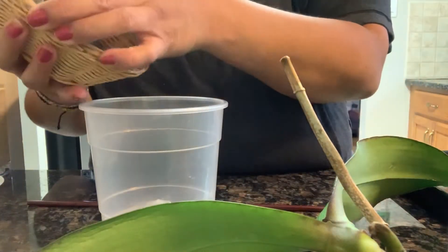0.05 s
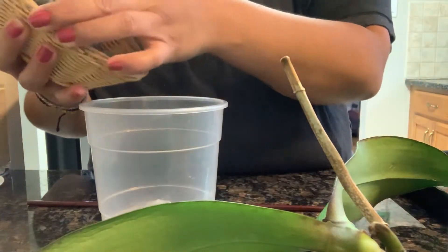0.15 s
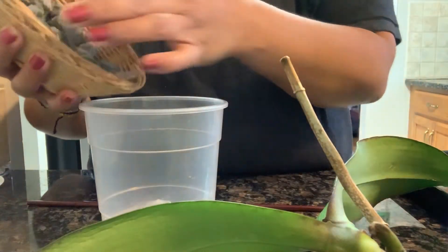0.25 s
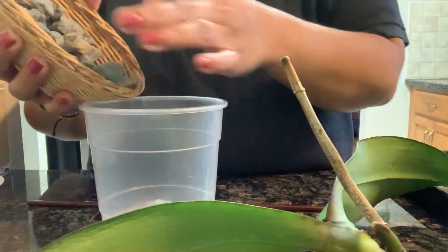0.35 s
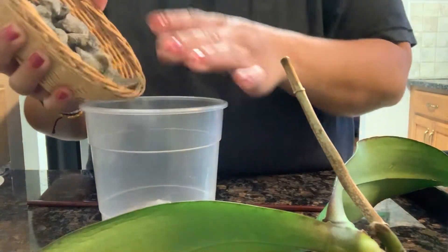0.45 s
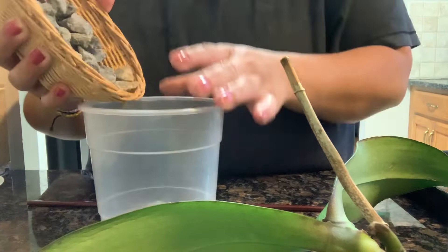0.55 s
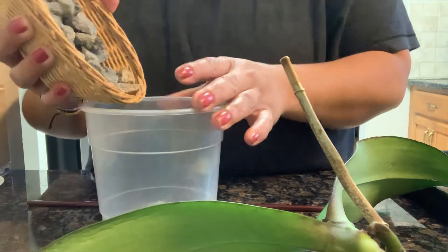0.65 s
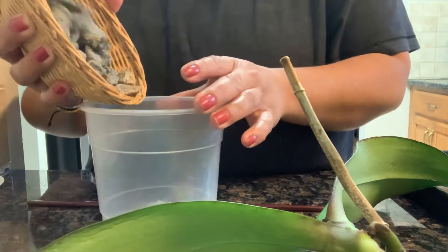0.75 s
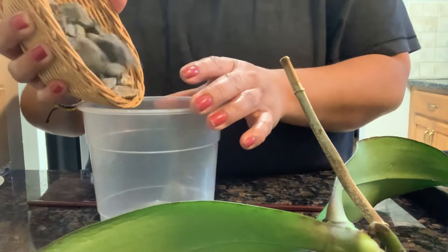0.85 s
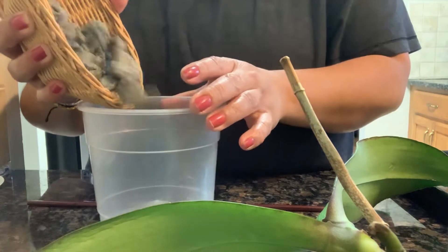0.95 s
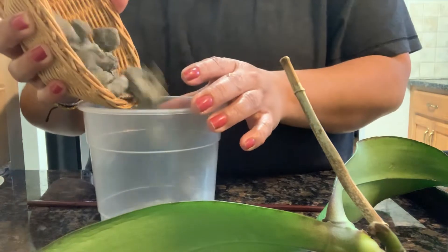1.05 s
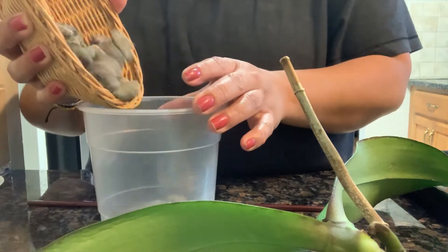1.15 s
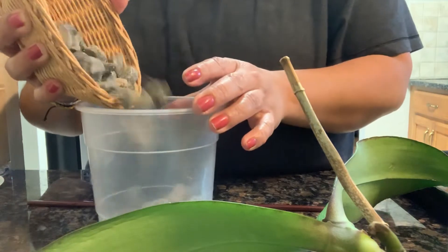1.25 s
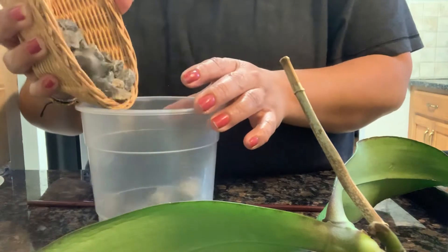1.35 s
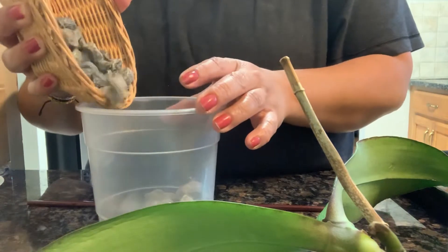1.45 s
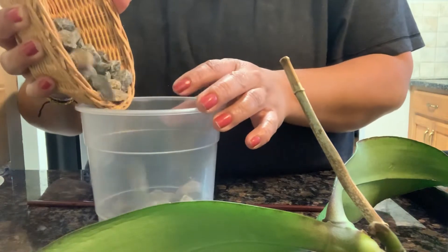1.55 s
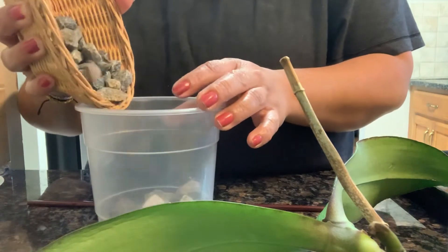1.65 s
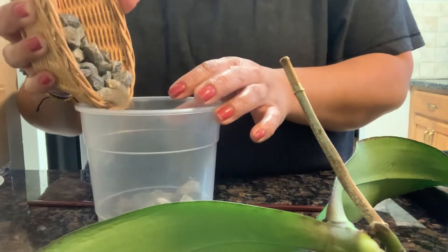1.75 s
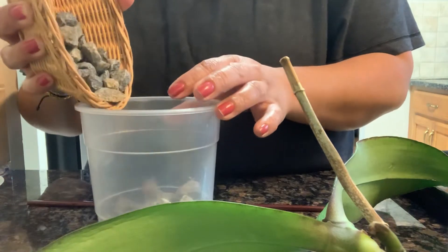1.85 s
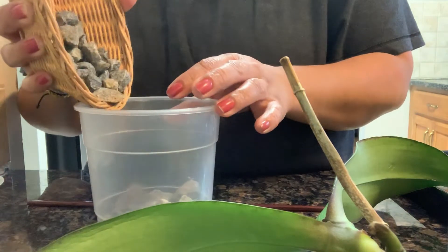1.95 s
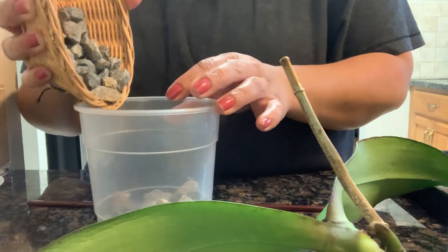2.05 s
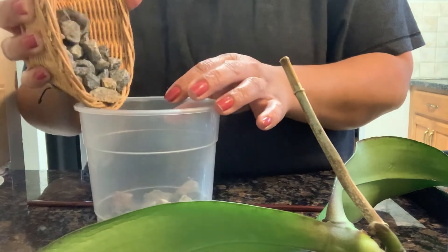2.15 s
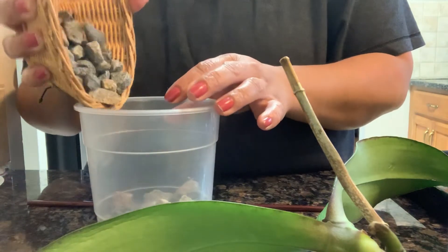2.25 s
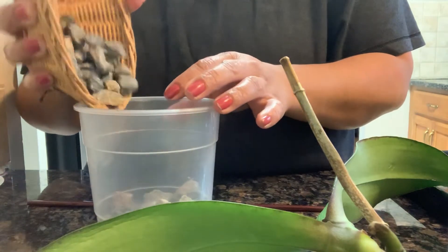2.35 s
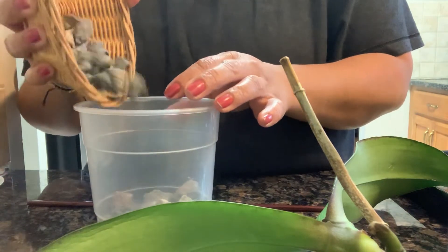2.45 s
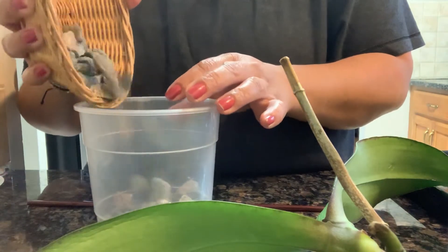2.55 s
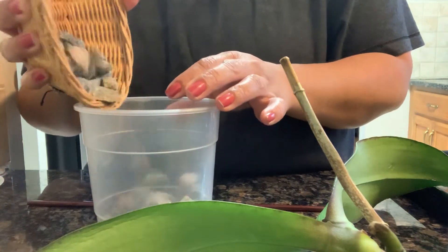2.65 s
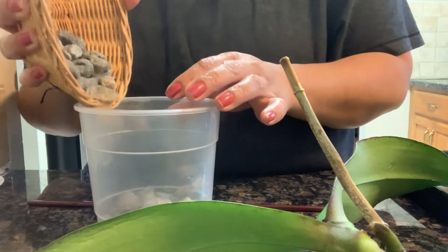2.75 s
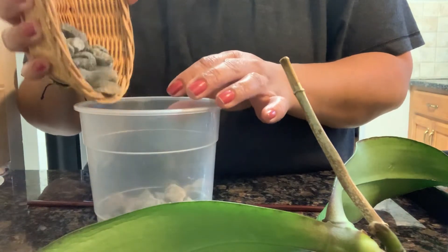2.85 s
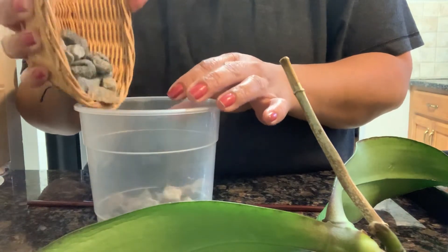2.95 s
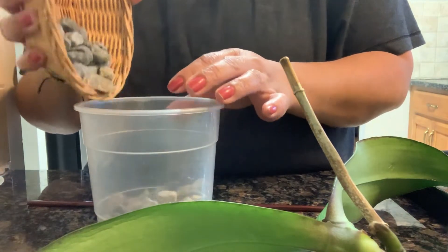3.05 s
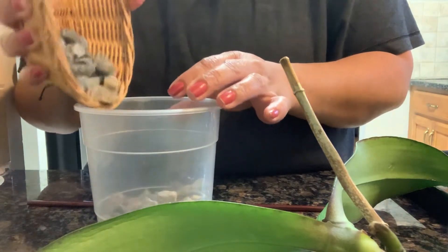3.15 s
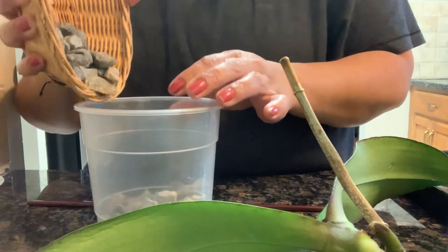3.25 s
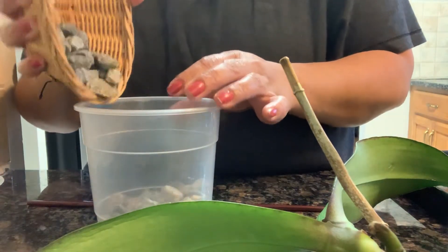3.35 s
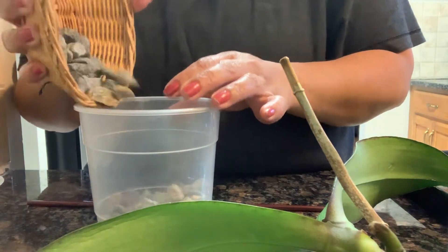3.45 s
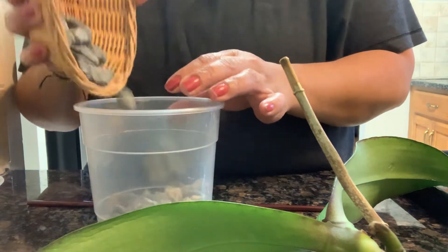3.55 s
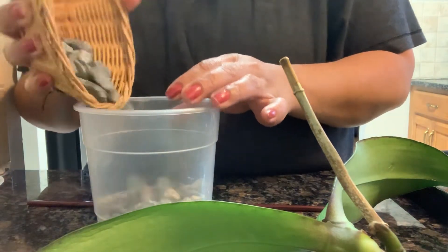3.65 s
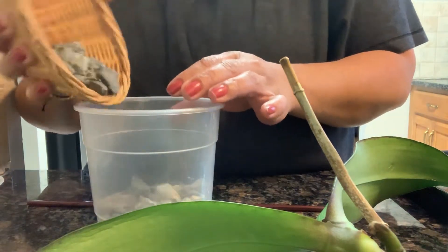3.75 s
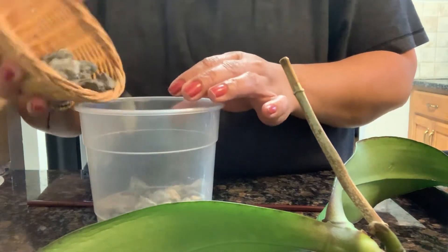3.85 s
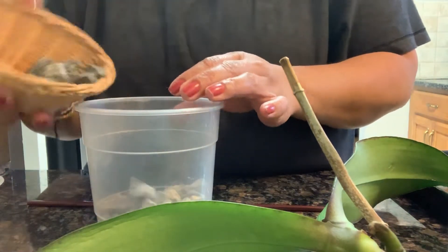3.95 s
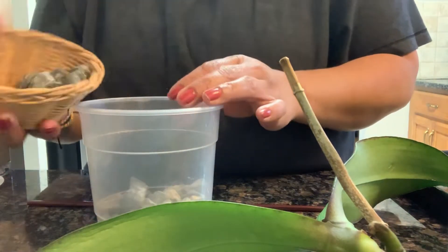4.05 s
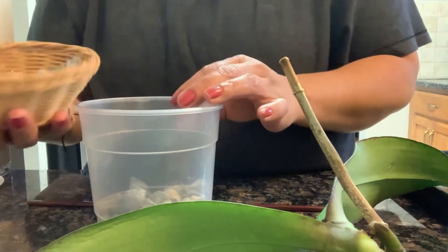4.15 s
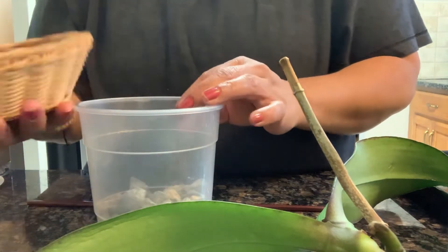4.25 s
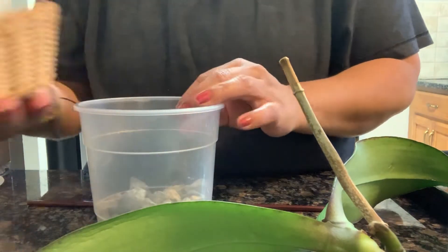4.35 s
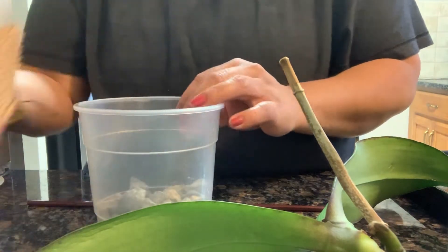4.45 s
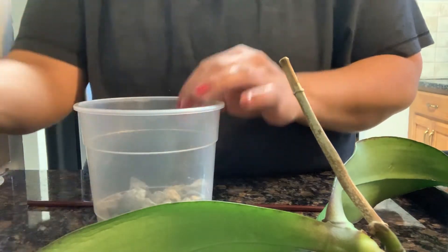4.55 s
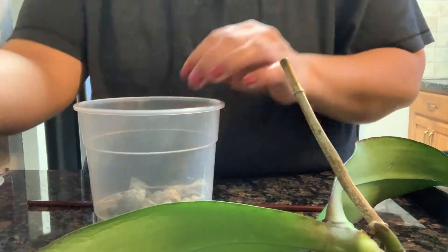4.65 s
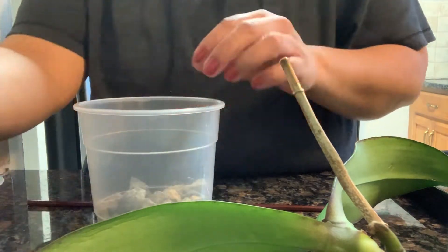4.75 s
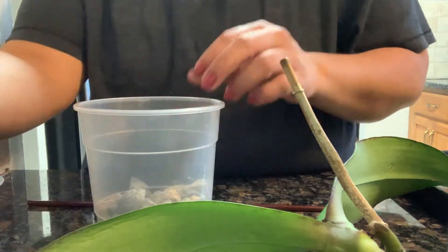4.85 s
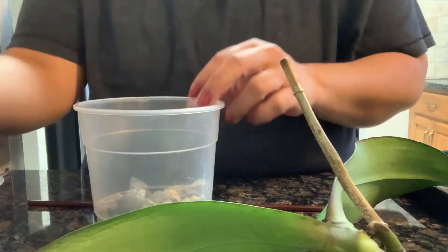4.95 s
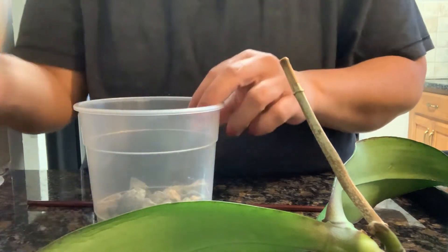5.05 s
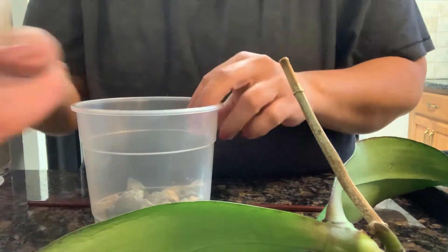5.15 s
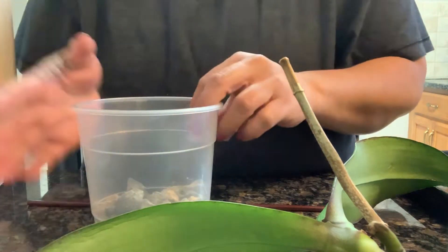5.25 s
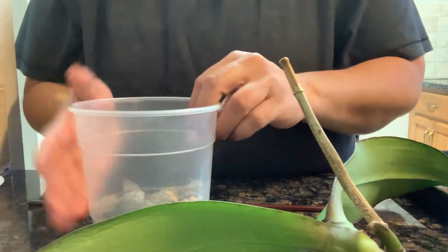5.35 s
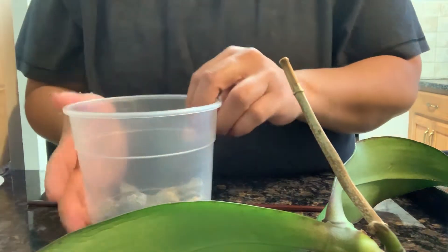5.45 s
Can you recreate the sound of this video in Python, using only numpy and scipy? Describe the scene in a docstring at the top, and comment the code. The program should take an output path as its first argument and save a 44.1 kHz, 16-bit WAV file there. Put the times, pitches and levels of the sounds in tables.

```python
"""Rough stones slide out of a wicker basket into a thin plastic pot on a stone counter, close to a phone.
Each blow is a noise flurry with a clean push that drives resonant modes: the pot rings near the struck spot,
the counter thumps, and stones crack on each other. Random grains over a smooth scrape make grit and wicker
rustle between the blows; decaying bands of noise answer as a small kitchen over an appliance rumble."""
import sys
import numpy as np
from scipy import signal
from scipy.fft import rfft, irfft
from scipy.io import wavfile
from scipy.ndimage import uniform_filter1d

SR = 44100
rng = np.random.default_rng(int(sys.argv[2]) if len(sys.argv) > 2 else 0)


def to_wav(s):
    """Save 16-bit WAV."""
    ch = np.atleast_2d(s).T  # columns
    pcm = np.round(np.clip(ch, -1, 1) * 32767)  # PCM
    wavfile.write(sys.argv[1], SR, pcm.astype(np.int16))


N = 242942  # length in samples

# stones landing on the pot: (t/s, level/dB, pitch of the struck spot f/Hz)
KNOCKS = [(.345, -25, 740), (0.364, -26, 670), (.457, -35.5, 460), (0.496, -23.5, 453), (.570, -8, 666),
          (.592, -12, 386), (.670, -21.5, 323), (.714, -36.5, 320), (.766, -19.5, 650), (.775, -13.5, 664),
          (0.857, -16.5, 910), (0.906, -23.5, 670), (.927, -22.5, 700), (0.971, -30, 550), (.993, -14, 635),
          (1.019, -22.5, 460), (1.055, -3.5, 940), (1.072, -14, 690), (1.088, -11, 694),
          (1.110, -20.5, 640), (1.131, -5.5, 900), (1.147, -10, 860), (1.172, -9.5, 880), (1.184, -6, 990),
          (1.196, -8, 756), (1.212, -9, 740), (1.224, -19, 680), (1.244, -4, 636), (1.273, -13.5, 563),
          (1.316, -13.5, 930), (1.335, -8.5, 600), (1.355, -9.5, 580), (1.372, -6.5, 590),
          (1.392, -6.5, 665), (1.431, -13.5, 790), (1.454, -12.5, 650), (1.493, -21.5, 543),
          (1.508, -12, 810), (1.526, -14.5, 910), (1.553, -27, 765), (1.575, -11.5, 860),
          (1.604, -9.5, 735), (1.656, -14, 885), (1.671, -22, 880), (1.716, -11.5, 960),
          (1.751, -24.5, 1030), (1.806, -21.5, 780), (1.845, -26.5, 780), (1.881, -17, 830),
          (1.969, -19.5, 980), (2.004, -28.5, 505), (2.028, -19.5, 510), (2.042, -18.5, 575),
          (2.078, -25, 540), (2.102, -35, 477), (2.248, -34, 332), (2.385, -28, 493), (2.415, -31.5, 394),
          (2.531, -13.5, 790), (2.548, -14.5, 500), (2.590, -6.5, 460), (2.601, -6, 620),
          (2.624, -12.5, 715), (2.656, -16, 614), (2.672, -14, 605), (2.707, -14, 420), (2.739, -11.5, 920),
          (2.781, -26, 520), (2.826, -15, 620), (2.84, -10, 483), (2.873, -9, 770), (2.906, -16.5, 496),
          (2.977, -20.5, 500), (2.803, -26.5, 500), (3.022, -15.5, 980), (3.046, -20.5, 460),
          (3.106, -23, 1200), (3.128, -27.5, 570), (3.171, -28, 515), (3.206, -23.5, 560),
          (3.352, -16.5, 880), (3.396, -26, 1110), (3.475, -19, 500), (3.506, -28.5, 755),
          (3.607, -15.5, 880), (3.626, -11, 567), (3.657, -8.5, 870), (3.708, -13, 496),
          (3.774, -24.5, 1010), (3.799, -31.5, 950), (3.814, -30.5, 494), (3.841, -34, 560),
          (3.951, -20.5, 613), (3.991, -25.5, 560), (4.067, -29.5, 895), (4.092, -29, 600),
          (4.128, -33, 1020), (4.189, -32.5, 930), (3.898, -41, 580), (4.273, -41.5, 604),
          (4.305, -40, 413), (4.518, -42.5, 820), (4.573, -40, 800), (4.660, -31, 720), (4.694, -43.5, 784),
          (4.750, -31, 397), (4.771, -33, 620), (4.849, -36, 840), (5.028, -44, 470), (4.888, -43, 590),
          (5.099, -45.5, 700), (5.179, -45, 364), (5.309, -47, 621.4), (5.376, -50, 790),
          (5.454, -44.5, 865)]


def undb(db):
    """Turn decibels into amplitude gain."""
    return 10 ** (np.asarray(db) / 20)


def fade(t60):
    """Give the amplitude gain per sample of a 60 dB decay over t60 seconds."""
    return np.exp(-np.log(1000) / (t60 * SR))


def ears(alike, size=N):
    """Make stereo noise whose two sides correlate by alike (0-1), from a mid and a side noise."""
    mid, side = rng.standard_normal((2, size))
    alike = np.clip(alike, 0, 1)
    opposed = side * np.array([[1], [-1]])
    return np.sqrt((1 + alike) / 2) * mid + np.sqrt((1 - alike) / 2) * opposed


def colour(x, points):
    """Shape a spectrum by (f/Hz, gain/dB) points, interpolated along log frequency."""
    hz, db = np.transpose(points)
    f = np.maximum(np.arange(N // 2 + 1) * SR / N, 1)
    gain = undb(np.interp(np.log(f), np.log(hz), db))
    return irfft(rfft(x) * gain, N)


def hum():
    """A low appliance rumble: coloured noise, nearly mono, whose level wavers a little."""
    # rumble spectrum before levelling: (f/Hz, relative density/dB)
    rumble_spectrum = [(15, -24.5), (25, -4), (59, -3), (125, -6), (207, -18), (293, -14), (326, -3),
                       (363, -7.5), (573, -15.5), (637, -29.5), (790, -32.5), (2780, -40), (4040, -29.5),
                       (8550, -41), (15000, -63)]
    level_db = -55  # RMS of the rumble
    step = SR // 6
    held = np.repeat(rng.standard_normal(N // step + 1), step)[:N]
    waver = uniform_filter1d(held, step)
    x = colour(ears(0.95), rumble_spectrum) * undb(2.0 * waver)
    return x * undb(level_db) / np.sqrt(np.mean(x ** 2))


def kitchen(x):
    """Dense echoes: noise bands that swell over a few milliseconds, then decay, longest in the bass."""
    # echo bands: (centre f/Hz, t60/s, level/dB, likeness of the two sides 0-1)
    echo_bands = [(150, 0.9, -14, 1), (390, 0.2, -7.5, 0.7), (926, 0.23, -9.5, 0.7),
                  (2700, 0.1, -4.5, 0.96), (6050, 0.092, -7, 0.4), (12000, 0.064, -11, 0.3)]
    n = np.arange(SR // 2)
    swell = 1 - np.exp(-n / (0.0042 * SR))
    echo = 0
    for hz, t60, db, alike in echo_bands:
        band = signal.butter(2, [hz / 1.6, hz * 1.6], "bandpass", fs=SR, output="sos")
        tail = ears(alike, len(n)) * fade(t60) ** n * swell
        level = undb(db) * np.sqrt(1 - fade(t60) ** 2)  # long tails start quieter
        echo = echo + level * signal.sosfilt(band, tail)
    return signal.fftconvolve(x, echo, axes=1)[:, :N]


def rustle():
    """Grit and wicker: tiny random knocks over a smooth scrape, with the power that slides in each layer."""
    # sliding over time: (t/s, level/dB, pot against it/dB, treble against it/dB)
    slide_curve = [(0, -73, -10, -10), (.16, -72.5, 0.5, -6), (.5, -55, 0.5, 0.5), (.74, -50.5, -16, -3),
                   (0.931, -48, -3, 10), (1.2, -29, 1, 0.5), (1.3, -40, 4, -3.5), (1.38, -36, 8, 1),
                   (1.9, -48, -4, -21), (2.18, -61, -11, -19.5), (2.3, -59.5, -9, -0.5),
                   (2.48, -53, -0.5, 1.5), (2.72, -32, 4, -9.5), (3.1, -52.5, 0, -14), (3.31, -63, -5, -16),
                   (3.55, -53, -0.5, 2), (3.699, -39.5, 8, -6.5), (3.92, -58.5, -1.5, -15),
                   (4.1, -53, 8.5, -9), (4.22, -64.5, 3, -0.5), (4.3, -55, -2.5, -3), (4.4, -65.5, -2, 5),
                   (4.52, -55.5, 0, 6), (4.82, -51, -0.5, -2), (5.0, -66.5, 2.5, -3), (5.12, -57, -8, -9.5),
                   (5.24, -73, -3, -20), (5.34, -61, -9, -3.5), (5.51, -68, -4.5, -8)]
    grit_per_s, grit_spread_db, scrape_share = 790, 3, 0.24
    counter_db = -11  # counter against the sliding level
    t, level_db, pot_db, treble_db = np.transpose(slide_curve)
    hits = rng.random(N) < grit_per_s / SR
    grit = hits * undb(grit_spread_db * rng.exponential(size=N)) ** 2
    grain = scrape_share + (1 - scrape_share) * grit / grit.mean()
    now = np.arange(N) / SR
    layers = (pot_db, 0, treble_db, counter_db)  # pot, stones, treble, counter
    return grain, [undb(np.interp(now, t, level_db + db)) ** 2 for db in layers]


def settle(s, db):
    """Loosened grit: each blow adds power that trickles away exponentially."""
    settle_db, settle_t60_s = -22.5, 0.21
    power = np.zeros(N)
    np.add.at(power, (s * SR).astype(int), undb(db + settle_db) ** 2)
    return signal.lfilter([1], [1, -fade(settle_t60_s) ** 2], power)


def strike(modes, s, db, hz, bed, reach, rise_s, t60, alike, push_db, tilt):
    """A swelling flurry of rough contacts plus one clean push rings the modes near each blow's pitch.

    reach is in octaves; bed is the rustle power that feeds the same modes, coloured by tilt.
    """
    favour_db, contact_cycles = 3.0, .3
    f, mode_db = np.array(modes)[:, 0], np.array(modes)[:, 1]
    gain = undb(mode_db) ** 2
    octaves_off = np.log2(f[:, None] / hz)
    share = gain[:, None] * (np.exp(-(octaves_off / reach) ** 2) + 0.067)
    # each stone lands its own way and favours other modes
    share = share * undb(favour_db * rng.standard_normal((len(s), len(f))).T) ** 2
    share = share / share.sum(axis=0) * undb(db) ** 2
    # most modes start the same way, a few against it
    sign = np.sign(rng.standard_normal(share.shape[::-1]).T + .9)
    push = undb(push_db) * np.sqrt(share) * sign
    bed_share = gain * (f / f.mean()) ** tilt
    bed_share = bed_share / bed_share.sum()
    rise, fall = np.exp(-1 / (rise_s * SR)), fade(t60) ** 2
    swell_poles = np.poly([rise, rise, fall])
    # the contact force jumps about once a millisecond
    jumps = undb(2.38 * np.repeat(rng.standard_normal(N // 40 + 1), 40)[:N])
    rough = ears(alike) * jumps / np.sqrt(np.mean(jumps ** 2))
    at = (s * SR).astype(int)
    out = 0
    for k, (mode_hz, _, ring_t60) in enumerate(modes):
        power = bed * (1 - fall) * bed_share[k]
        np.add.at(power, at, share[k])
        power = signal.lfilter([(1 - rise) ** 2], swell_poles, power + 1e-18)
        flurry = np.sqrt(power + 1e-18)
        clean = np.full(N, 1e-18)
        np.add.at(clean, at + int(2 * rise_s * SR), push[k])
        # a push lasts part of a cycle
        clean = uniform_filter1d(clean, size=max(int(contact_cycles * SR / mode_hz), 1))
        r, w = fade(ring_t60), 2 * np.pi * mode_hz / SR
        poles = [1, -2 * r * np.cos(w), r * r]
        out = out + signal.lfilter(np.sqrt(1 - r) * np.array([1, 0, -1]), poles, flurry * rough)
        out = out + signal.lfilter([np.sin(w)], poles, clean)
    return out


def counter_thumps(grain, sliding):
    """The stone counter's low modes answer every knock a little, the blows through the pot's floor, and the pot
    shifting on the counter late on."""
    # counter modes: (f/Hz, level/dB, t60/s)
    counter_modes = [(60, -22.5, 0.27), (91, 1.5, 0.065), (124, 12, 0.11), (168, 6, .07)]
    # blows that reach the counter through the pot's floor, and late on the pot shifting on the counter: (t/s,
    # level/dB)
    thuds = [(0.343, -33), (.495, -25), (0.593, -20.5), (0.668, -23.5), (0.773, -17), (0.926, -23.5),
             (1.02, -13.5), (1.088, -18.5), (1.195, -15.5), (1.245, -13.5), (1.355, -15), (1.398, -24.5),
             (1.492, -24.5), (1.882, -29), (2.043, -34), (2.395, -29.5), (2.548, -24.5), (2.592, -16),
             (2.730, -23.5), (2.828, -24.5), (3.495, -31), (3.657, -19), (3.991, -38), (4.750, -34),
             (4.783, -35.5), (4.818, -42), (4.888, -37), (5.048, -37), (5.181, -46)]
    thump_db, cushion_db_per_s = -22, 3.5  # knocks thump less as the stones pile up
    s, db, _ = np.transpose(KNOCKS)
    thud_s, thud_db = np.transpose(thuds)
    db = np.append(db + thump_db - cushion_db_per_s * s, thud_db)
    s = np.append(s, thud_s)
    thumps = strike(counter_modes, s, db, 140, grain * sliding, reach=3, rise_s=0.0076,
                    t60=0.021, alike=0.98, push_db=-17.0, tilt=.1)
    return signal.sosfilt(signal.butter(3, 55, "highpass", fs=SR, output="sos"), thumps)


def cracks_and_creaks():
    """List the bright blows: stone on stone, and wicker ticks as the basket flexes."""
    # stone on stone: (t/s, level/dB, pitch f/Hz, treble tick against the crack/dB)
    cracks = [(0.346, -43.5, 2960, 15.5), (0.361, -33, 3910, 6.5), (.494, -36.5, 2480, 1),
              (.566, -10, 3590, -14), (0.59, -21, 2640, -3.5), (.665, -30, 2990, 0),
              (0.762, -26, 4400, -21), (0.774, -24.5, 1970, -2), (0.855, -21, 2630, -3),
              (0.992, -22.5, 2920, -9.5), (1.02, -27.5, 2265, -1), (1.053, -10.5, 3460, -5.5),
              (1.074, -17.5, 2520, 0.5), (1.085, -20, 2750, 1.5), (1.120, -23, 2770, -8.5),
              (1.149, -12.5, 1830, -21), (1.184, -16.5, 3400, -1), (1.197, -16.5, 2560, -10.5),
              (1.214, -24.5, 2890, 7), (1.242, -17, 3200, -6.5), (1.254, -22, 3250, -1),
              (1.286, -27.5, 3530, -11), (1.316, -13, 3300, -11), (1.333, -13.5, 3730, -3.5),
              (1.354, -15.5, 4780, 8), (1.361, -9, 3100, -12.5), (1.382, -20.5, 3370, 6),
              (1.4, -14.5, 3120, -8), (1.441, -27.5, 2710, 2), (1.457, -6, 2260, -21.5),
              (1.485, -26.5, 3700, 2), (1.506, -16, 3810, -7.5), (1.528, -15.5, 3490, -21),
              (1.580, -17.5, 2300, -0.5), (1.596, -18, 2770, -4), (1.613, -17.5, 2280, -8.5),
              (1.645, -21, 4580, -17), (1.670, -27.5, 2530, -9.5), (1.713, -16, 2510, -3),
              (1.783, -27, 2850, -3.5), (1.806, -20, 2670, -17.5), (1.826, -25, 3600, -2.5),
              (1.866, -17.5, 2700, -12), (1.880, -11.5, 2660, -1), (1.905, -22.5, 2420, -23),
              (1.92, -27.5, 2360, -6), (1.968, -9.5, 2890, -10.5), (2.001, -26, 2250, -25),
              (2.04, -19.5, 4850, -9), (2.533, -4.5, 2380, -14.5), (2.551, -30.5, 3010, 8),
              (2.579, -13.5, 2930, -6), (2.587, -20, 3500, -4), (2.600, -9, 2850, -10.5),
              (2.626, -10.5, 2140, -8), (2.642, -7.5, 2830, -10.5), (2.674, -33, 2800, 8),
              (2.692, -20, 2640, -10.5), (2.710, -24, 3740, 8.5), (2.742, -7.5, 2670, -8.5),
              (2.775, -28.5, 2540, -9.5), (2.800, -32.5, 3250, -10), (2.837, -17.5, 3260, 6.5),
              (2.864, -20, 2880, -9), (2.872, -23.5, 2260, 6), (2.904, -20.5, 4570, -14.5),
              (2.924, -34.5, 3470, -5.5), (3.023, -9, 2535, -4), (3.045, -23, 3060, -7),
              (3.105, -16, 2390, -10.5), (3.13, -27, 2370, -14), (3.161, -32, 3330, -14.5),
              (3.35, -20, 2390, -1), (3.364, -25, 2180, -10.5), (3.396, -17.5, 2940, -4),
              (3.465, -25, 2650, -11.5), (3.476, -23.5, 2345, -15.5), (3.508, -33, 3100, -3.5),
              (3.539, -33, 2940, 1), (3.205, -42, 1880, 5.5), (3.600, -23.5, 2500, -1.5),
              (3.606, -16.5, 2210, 2), (3.626, -12, 2980, -3), (3.657, -14, 2860, -4),
              (3.669, -4.5, 2305, -10.5), (3.674, -10, 2700, -7.5), (3.723, -25, 2260, -16),
              (3.769, -19, 2580, -1.5), (3.814, -36, 2240, 4), (3.896, -38, 2530, -13.5),
              (3.949, -19.5, 2840, -2), (3.981, -29.5, 2550, -25.5), (4.067, -33, 2980, -7),
              (4.131, -40.5, 2250, -9), (4.189, -48, 2340, 3.5), (4.669, -38, 2880, 4.5),
              (4.748, -40, 2800, 1), (5.452, -48.5, 2530, -26)]
    # wicker ticks: (t/s, level/dB)
    creaks = [(.178, -50.5), (0.196, -37), (0.297, -42), (.309, -38.5), (0.438, -43), (.481, -43.5),
              (.535, -36.5), (0.725, -41), (0.748, -40.5), (.829, -41.5), (.875, -28.5), (.897, -32),
              (.912, -30), (.948, -39), (.967, -40), (2.208, -58), (2.246, -47), (2.268, -47),
              (2.297, -42.5), (2.313, -46), (2.407, -42), (2.417, -41), (2.440, -35.5), (3.838, -44.5),
              (4.203, -49), (4.317, -42.5), (4.343, -46.5), (4.502, -42.5), (4.588, -44.5), (4.612, -46.5),
              (4.658, -45.5), (4.710, -46), (4.736, -45.5), (4.772, -50), (4.791, -42.5), (4.829, -44),
              (4.847, -43.5), (4.948, -54), (5.028, -47), (5.095, -50.5)]
    creak_hz, creak_tick_db = 4500, 9.5
    wicker = [(s, db, creak_hz, creak_tick_db) for s, db in creaks]
    return np.transpose(list(cracks) + wicker)


def stone_cracks(grain, sliding):
    """Stone contacts and wicker ticks ring short, bright modes, with grit settling after them."""
    # stone modes: (f/Hz, level/dB, t60/s)
    stone_modes = [(1645, 15.5, 0.0073), (2314, 18, 0.0021), (2490, -5.5, 0.057), (2650, 0, 0.005),
                   (3038, 7.1, 0.013), (3457, 14.5, 0.005), (4320, 8, 0.0042), (4070, 4, 0.0044),
                   (5200, -3, 0.0039), (5790, -0.7, 0.025)]
    s, db, hz, _ = cracks_and_creaks()
    return strike(stone_modes, s, db, hz, grain * (sliding + settle(s, db)), reach=0.33,
                  rise_s=0.000607, t60=0.025, alike=0.022, push_db=-2, tilt=1.9)


def treble_ticks(grain, sliding):
    """The same cracks and wicker ticks excite very short treble modes at their own level."""
    # treble modes: (f/Hz, level/dB, t60/s)
    tick_modes = [(7160, 2.5, 0.0015), (8350, 5.5, 0.0019), (10030, 4.5, 0.0016), (12500, -11, 0.0073),
                  (15800, -31.5, .003)]
    s, crack_db, _, tick_db = cracks_and_creaks()
    db = crack_db + tick_db
    return strike(tick_modes, s, db, 9000, grain * (sliding + settle(s, db)), reach=3,
                  rise_s=0.00096, t60=0.024, alike=0.26, push_db=-11.5, tilt=.1)


def pot_knocks(grain, sliding):
    """Stones knock the thin plastic pot, which rings most in the modes near the struck spot's pitch."""
    # pot modes: (f/Hz, level/dB, t60/s)
    pot_modes = [(227, -11, 0.057), (313.7, 4.5, 0.12), (343, 1, 0.089), (389, 4.5, 0.03),
                 (452, 4.5, 0.069), (519, 5, 0.041), (572, -4.5, 0.026), (673, -9.5, 0.033),
                 (726.7, -3.5, 0.2), (785, 6.5, 0.065), (848, -3, 0.059), (963, -4.5, 0.022),
                 (1039, -1.5, 0.028), (1094, 1.5, .03), (1280, -18.5, 0.027), (1375, -27.5, .02)]
    s, db, hz = np.transpose(KNOCKS)
    return strike(pot_modes, s, db, hz, grain * (sliding + settle(s, db)), reach=.35,
                  rise_s=0.000825, t60=0.017, alike=0.78, push_db=-6.5, tilt=0.24)


def stones():
    """All that the stones set ringing; one stream of grit grains feeds every layer."""
    grain, (pot_slide, stone_slide, treble_slide, counter_slide) = rustle()
    low = counter_thumps(grain, counter_slide) + pot_knocks(grain, pot_slide)
    bright = stone_cracks(grain, stone_slide) + treble_ticks(grain, treble_slide)
    return low + bright


def scene():
    """Mix the stones, their kitchen echoes and the rumble."""
    near = stones()
    return near + kitchen(near) + hum()


def record(dry):
    """Two ports: the right is hotter in the low middle; a shared, shifted treble; soft peaks; cut top."""
    split_hz, lag_s, turn_rad = 6900, 0.0004099, 2.39
    right_db = 3.5  # right against left at the centre of the hump
    shelf_hz, shelf_db, top_hz = 15800, -27, 16900
    f = np.arange(N // 2 + 1) * SR / N
    left, right = rfft(dry)
    # above the split both sides carry one treble, the right side late and turned in phase
    high = 1 / (1 + (split_hz / (f + 1)) ** 8)
    late = np.exp(1j * (turn_rad - 2 * np.pi * f * lag_s))
    # half of the hump lifts the right, half lowers the left
    hump = np.exp(-(np.log((f + 1) / 1200) / 0.92) ** 2)
    hot = undb(right_db * hump / 2)
    right = np.sqrt(1 - high) * right * hot + np.sqrt(high) * left * late
    out = irfft(np.array([left / hot, right]), N)
    out = np.tanh(1.212 * out) / 1.248
    # the deepest bass falls away and the top steps down
    shelf = np.where(f > shelf_hz, undb(shelf_db), 1) / (1 + (32 / (f + 1)) ** 2)
    out = irfft(rfft(out) * shelf, N)
    return signal.sosfilt(signal.ellip(8, .2, 70, top_hz, fs=SR, output="sos"), out)


dry = scene()
out = record(dry)
to_wav(out)
```